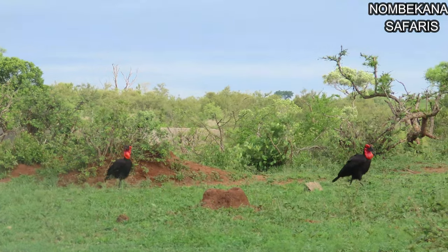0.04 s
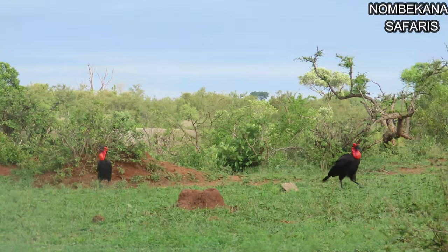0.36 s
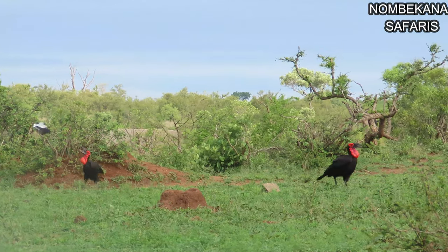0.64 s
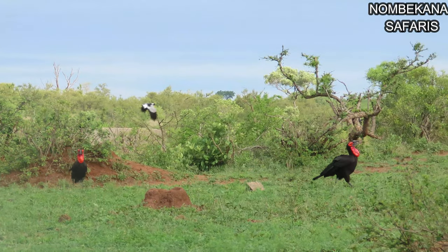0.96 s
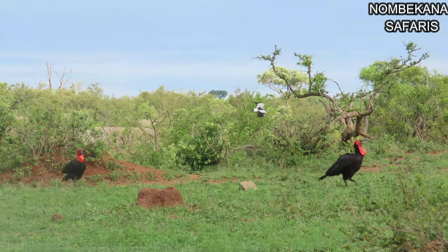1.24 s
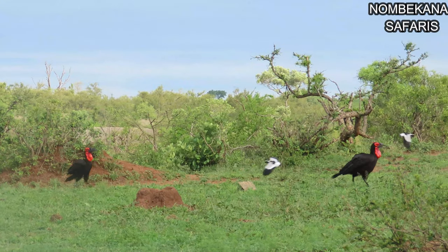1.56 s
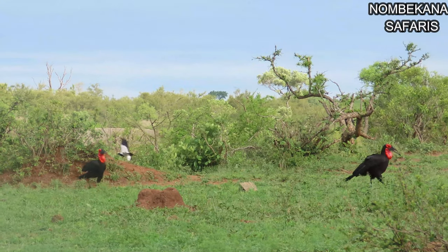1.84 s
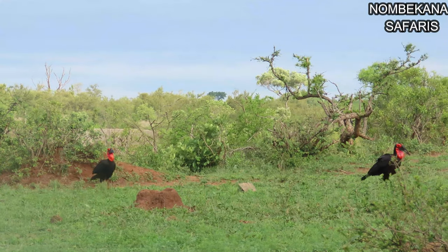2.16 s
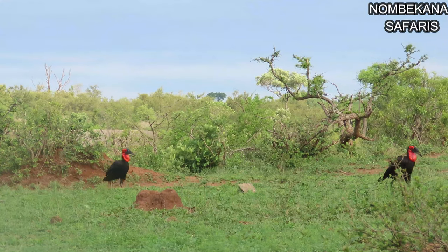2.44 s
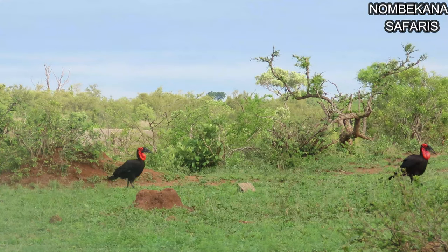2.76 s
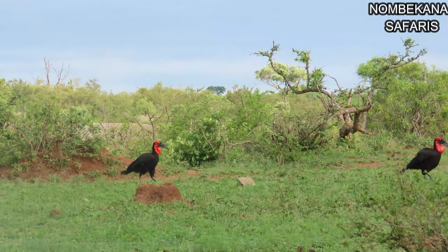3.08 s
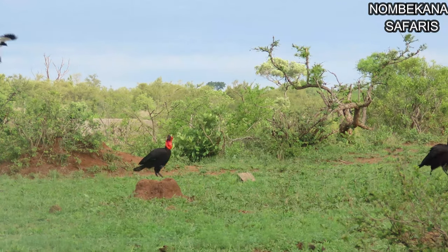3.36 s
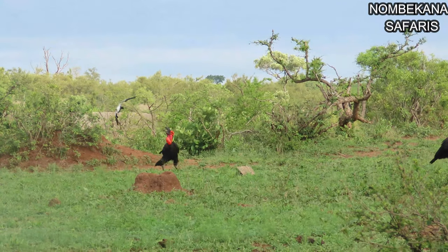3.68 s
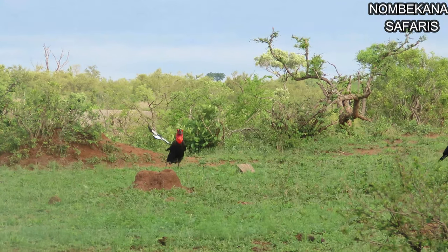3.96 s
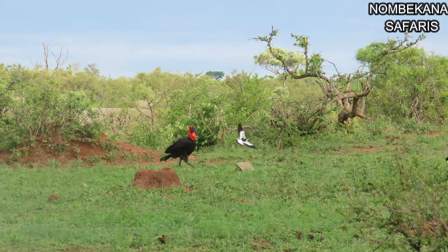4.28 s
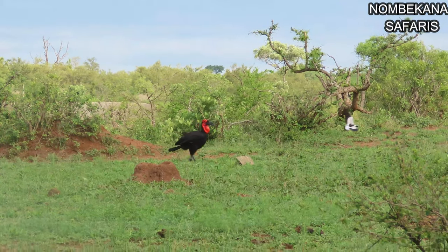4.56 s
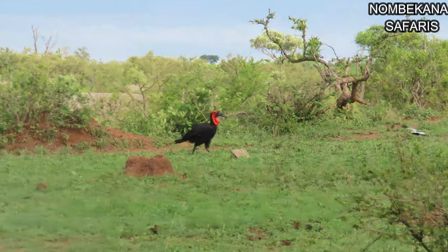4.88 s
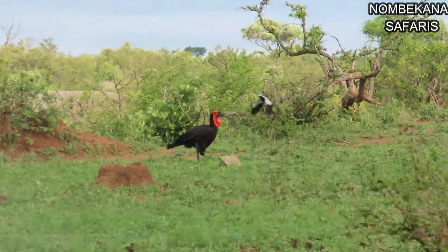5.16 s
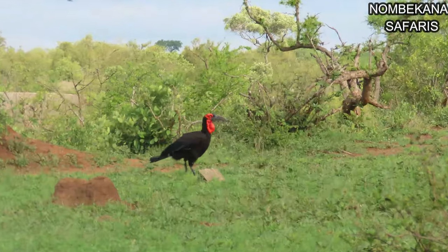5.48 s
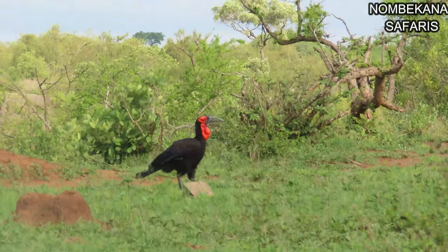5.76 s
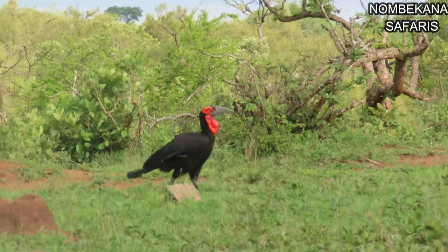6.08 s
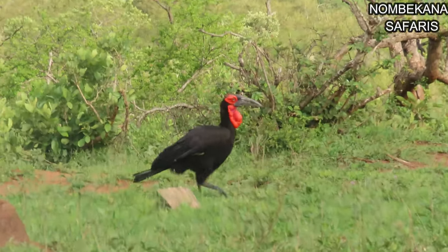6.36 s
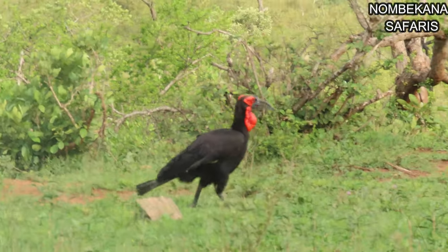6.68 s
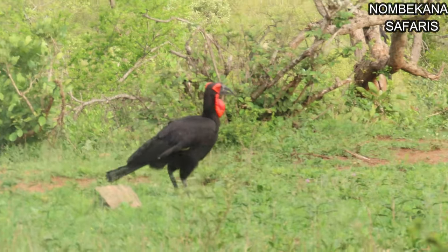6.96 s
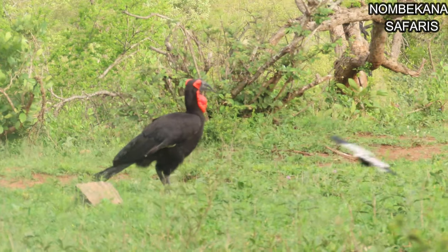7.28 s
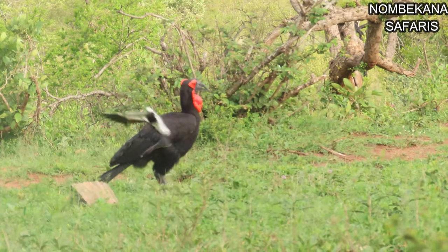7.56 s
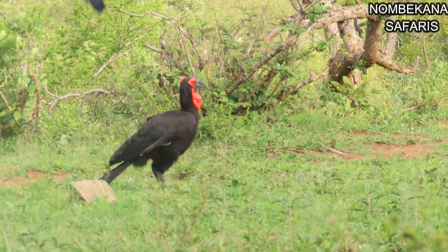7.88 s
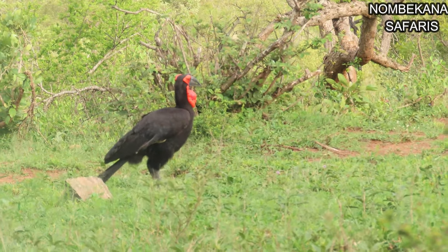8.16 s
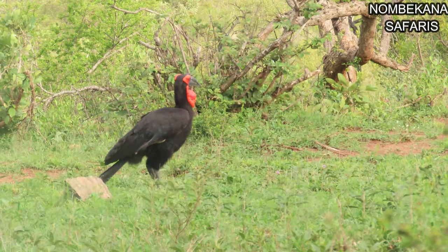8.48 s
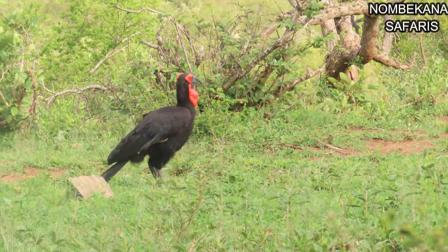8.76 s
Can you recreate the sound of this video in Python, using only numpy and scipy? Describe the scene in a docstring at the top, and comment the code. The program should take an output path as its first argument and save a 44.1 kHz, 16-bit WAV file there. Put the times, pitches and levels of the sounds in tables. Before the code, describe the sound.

Lapwings give sharp, metallic tink calls in uneven runs, with softer notes in between. A faint vehicle hum sits underneath and winds down about halfway through. Wind buffets the microphone with low thumps, mostly in the middle, and two soft knocks sound close by. Faint whistles of other birds come from far off, over the steady hiss and low rumble of open grassland.

```python
"""Grassland hiss and a vehicle's hum, pierced at once by the metallic 'tink' of lapwings mobbing intruders.
Each full call is a tiny grace note, a rasp and two syrinx tones sounding together; softer runs fall in
between, and bushes throw back a faint echo. Other birds whistle and hoot far off. Wind buffets the
microphone and a faint whirr sounds close to it. The hum winds down, and there are two soft knocks
and a pair of hollow bumps."""
import sys
import numpy as np
from scipy import signal
from scipy.io import wavfile

SR = 44100
rng = np.random.default_rng(int(sys.argv[2]) if len(sys.argv) > 2 else 0)


def transcribe(signal):
    """Save signal, clipped to [-1, 1], as a 16-bit WAV file at the path in sys.argv[1]."""
    frames = np.atleast_2d(signal).T
    limited = np.clip(frames, -1, 1)
    pcm = np.round(limited * 32767).astype(np.int16)
    wavfile.write(sys.argv[1], SR, pcm)


N = 389403
TIME = np.arange(N) / SR

# open-air bed: t/s, rumble level/dB, distant murmur level/dB
AIR_LEVELS = [(0, -45.5, -51), (4.85, -51, -53), (5.02, -52.5, -57.5), (6.66, -47.5, -59),
              (6.78, -49.5, -52.5), (8.83, -49.5, -52.5)]
# colours of the bed's three layers: f/Hz, relative density/dB
RUMBLE_SPECTRUM = [(22, -3.5), (50, -1.5), (100, -2.5), (160, -5.5), (230, -6.5), (350, -13), (700, -41)]
MURMUR_SPECTRUM = [(300, -7.5), (520, 7), (1050, 3), (2200, -3), (3500, -8), (6000, -23.5)]
HISS_SPECTRUM = [(300, 16.5), (450, 3), (620, -9), (1000, 1.5), (2000, 0), (4000, -3.5), (6000, -8),
                 (9000, -14.5), (12000, -18), (17500, -47)]
# stereo image of the bed: f/Hz, left-right correlation
STEREO_LIKENESS = [(120, 1), (260, 0.69), (500, 0.44), (1000, 0.58), (8000, 0.49), (14000, 0.31)]

# vehicle hum winding down: t/s, f/Hz, level/dB
HUM_CURVE = [(0, 188.5, -45), (3.25, 186.5, -46), (3.6, 163.4, -45.5), (3.95, 138.3, -54.5),
             (4.4, 112, -79)]
# its harmonics 1-3: relative level/dB
HUM_HARMONICS = [-2.5, -11.5, -22]

# resonances of a faint whirr close to the microphone: f/Hz, width/Hz, level/dB
WHIRR_BANDS = [(471.5, 47, -62), (876.6, 32, -60.5), (999, 44, -62)]
# fader on the whirr, which pauses for a while: t/s, gain/dB
WHIRR_FADER = [(4.75, 1.5), (4.95, -10), (6.68, -14), (6.78, -3)]
# breeze on the microphone: t/s, level/dB, eddy centre f/Hz
BREEZE = [(1.85, -53.5, 55), (2.3, -39, 52), (2.68, -33, 57.6), (3.1, -47.5, 83.5), (3.42, -41, 76),
          (4.03, -36, 100), (4.27, -40.5, 71.6), (4.44, -33, 87), (4.52, -44.5, 90), (4.62, -33.5, 114),
          (4.8, -37.5, 114), (4.9, -47, 120), (5.35, -47, 99), (6.05, -50, 73), (6.36, -37, 87),
          (6.9, -57.5, 70), (7.9, -47, 88), (8.2, -54, 86)]

# full calls: t/s, length/s, low voice f/Hz, high voice f/Hz, low voice level/dB, high voice level/dB,
# low voice's octave level/dB, rasp level/dB, rasp length/s, grace note lead/s
FULL_CALLS = [(0.126,0.041,4330,6500,-38,-46,-46,-33.5,0.0023,.013),
              (0.3,0.04,4268,6330,-34.5,-46,-49.5,-36,0.0019,.012),
              (.466,.036,4237,6210,-34.5,-42,-49,-36,0.00091,0.014),
              (0.994,0.024,4100,5950,-57,-64,-71,-47,0.0073,0.011),
              (1.223,0.038,4310,6300,-47,-59,-61,-45.5,0.0081,0.0057),
              (1.64,0.014,4480,6240,-47,-57,-63,-40.5,0.0055,0.01),
              (2.546,0.024,4380,6160,-31.5,-35.5,-48.5,-33.5,0.01,0.014),
              (2.742,0.025,4270,6100,-29,-37.5,-53,-29,0.01,0.014),
              (2.9395,.029,4215,5995,-36.5,-40,-45.5,-26.5,0.0021,0.012),
              (3.125,0.03,4120,5970,-47,-39,-46,-26.5,0.0018,0.013),
              (3.3202,0.018,4595,6740,-32,-46,-44,-32.5,0.0053,0.011),
              (3.522,0.024,4470,6570,-36,-51.5,-49,-33.5,0.0063,0.0084),
              (4.054,0.015,4610,6540,-36,-46,-55.5,-30,0.0049,0.0095),
              (5.853,0.019,4370,6310,-31,-45,-66,-37,0.0057,0.01),
              (6.057,0.03,4360,6290,-42,-39.5,-38.5,-33.5,0.0089,0.0065),
              (6.5607,0.024,4305,6150,-32,-42,-55,-34,0.0075,0.0082),
              (6.7483,0.027,4110,5760,-31,-45,-39.5,-33.5,0.00084,0.01),
              (7.146,0.015,4110,5900,-38,-49.5,-58,-34.5,0.0037,0.012),
              (8.208,0.034,4250,6070,-41.5,-51,-64,-36,0.011,0.013),
              (8.3964,0.031,4135,5920,-33,-37.5,-49,-32,0.0058,0.016),
              (8.589,0.023,4260,6140,-47,-56,-52.5,-46,0.01,0.0098),
              (8.766,0.036,4200,6175,-44.5,-50,-68,-38.5,0.0065,.012)]
# grace note harmonics 1-6: relative level/dB
GRACE_HARMONICS = [-6.5, 7, 2, -3, -14, -17.5]
# envelope of a call's tones: share of the length, gain/dB
CALL_ENVELOPE = [(0, 1), (.25, 2.2), (.5, 1.7), (.78, -.5), (1, -7.5)]
# throat resonances: f/Hz, width/Hz, relative level/dB
THROAT_BANDS = [(3100, 200, 2), (3360, 110, -19), (3950, 410, 4), (5630, 560, -8), (7900, 7300, -6.5)]
# thin whistles of far birds: t/s, length/s, start f/Hz, end f/Hz, arch as a share of pitch, level/dB
FAR_WHISTLES = [(.565, .082, 5250, 5550, -.065, -61), (0.703, 0.014, 5240, 5470, 0.0082, -49),
                (1.801, 0.037, 1335, 1290, 0.0027, -54.5), (1.935, 0.032, 1900, 1780, -0.002, -52.5),
                (3.954, 0.073, 4100, 3450, 0, -59.5), (4.302, .023, 3430, 3260, 0, -56),
                (7.07, 0.16, 5540, 4100, -0.019, -58), (7.351, 0.16, 5600, 4230, 0.0057, -61.5),
                (7.699, 0.13, 5230, 3820, -0.01, -62.5)]
# low, distant hoots: t/s, f/Hz, level/dB
FAR_HOOTS = [(5.378, 437, -55.5), (5.524, 438, -52.5)]
# soft calls between the attacks: t/s, low voice f/Hz, low voice level/dB, high voice level/dB
SOFT_RUNS = [(.893,4000,-57.5,-61.5), (1.806,4250,-60,-67), (1.9,4120,-57,-70), (1.984,4310,-57.5,-64.5),
             (2.148,4280,-52.5,-59), (2.343,4300,-48.5,-54.5), (2.886,4484,-57,-59), (4.984,3990,-68,-63),
             (5.16,4100,-53,-78), (5.262,4360,-56.5,-71), (5.351,4320,-56,-71), (5.44,4350,-50.5,-69),
             (5.654,4440,-46.5,-52), (6.143,4450,-50.5,-56.5), (7.279,4380,-53,-69), (7.474,4280,-58.5,-62),
             (7.682,4220,-56,-60.5), (7.838,4220,-55.5,-59), (8.031,4170,-46.5,-57.5)]

# sudden buffets of wind: t/s, level/dB, eddy f/Hz
WIND_BUFFETS = [(2.357,-31,72.4), (2.619,-32,66.8), (2.751,-28,75.8), (2.968,-31,97.8), (3.864,-27,94.2),
                (4.353,-24.5,104.8), (4.46,-24.5,110.4), (4.578,-30.5,169.8), (4.642,-36.5,189),
                (4.722,-22.5,98.8), (4.752,-22,107.2), (4.82,-32.5,195.7), (5.413,-33.5,133.6),
                (5.755,-32,141.9)]
# soft, hollow bumps: t/s, level/dB, f/Hz
HOLLOW_BUMPS = [(4.862, -43.5, 440), (4.902, -38.5, 432)]
# knocks: t/s, body level/dB, tick level/dB
KNOCK_HITS = [(3.013, -32, -34), (6.5907, -22, -24.5)]
# modes of the knocked body: f/Hz, relative level/dB, t60/s
BODY_MODES = [(670, -16, 0.016), (848, -9.5, 0.057), (965, 1, 0.05), (1980, -2, 0.016)]


def from_db(db):
    """Decibels to gain."""
    return 10 ** (np.asarray(db) / 20)


def rms_one(x):
    """Scale to unit rms."""
    return x / np.sqrt(np.mean(x ** 2) + 1e-20)


def in_time(rows):
    """Each column of an automation curve at every sample."""
    times, *columns = np.transpose(rows)
    return [np.interp(TIME, times, column) for column in columns]


def at_hz(points, hz):
    """Read a spectrum on a log-frequency axis."""
    freqs, values = np.transpose(points)
    return np.interp(np.log(hz), np.log(freqs), values)


def add(track, s, sound):
    """Mix a sound into a track at s seconds."""
    start = max(round(s * SR), 0)
    track[start:start + len(sound)] += sound[:max(N - start, 0)]


def band(x, low_hz, high_hz):
    """Butterworth band-pass."""
    sos = signal.butter(2, [low_hz, min(high_hz, SR * .49)], "band", fs=SR, output="sos")
    return signal.sosfilt(sos, x)


def noise(shape, low_hz, high_hz):
    """A band of noise at unit rms."""
    return rms_one(band(rng.standard_normal(shape), low_hz, high_hz))


def drift(rate, size=N):
    """Random modulation with a spread near 1, changing `rate` times a second."""
    steps = np.arange(size) * rate / SR
    count = int(steps[-1]) + 2
    return np.interp(steps, np.arange(count), rng.standard_normal(count))


def phase_of(hz):
    """Running phase of an oscillator, from a random start."""
    return 2 * np.pi * (np.cumsum(hz) / SR + rng.random())


def noise_bed(spectrum, flicker_db, flicker_rate):
    """Half-octave bands of stereo noise, flickering partly together; unit rms."""
    bed, together = 0, drift(flicker_rate)
    edges = 20 * 2 ** np.arange(0, 10.1, .5)
    white = rng.standard_normal((2, 2, N))
    for k, (low, high) in enumerate(zip(edges, edges[1:])):
        hz = np.sqrt(low * high)
        if spectrum[0][0] <= hz <= spectrum[-1][0]:
            mid, side = band(white[k % 2], low, high)
            alike = at_hz(STEREO_LIKENESS, hz)
            gain = from_db(at_hz(spectrum, hz) + flicker_db * (together + drift(flicker_rate)) / 2)
            bed += gain * (np.sqrt(1 + alike) * mid + np.sqrt(1 - alike) * side * [[1], [-1]])
    return rms_one(bed)


def open_air(hiss_db=-56):
    """A low rumble, a distant murmur that drops away for a while, and the hiss of the bush."""
    rumble_db, murmur_db = in_time(AIR_LEVELS)
    rumble = from_db(rumble_db) * noise_bed(RUMBLE_SPECTRUM, flicker_db=2.5, flicker_rate=17)
    murmur = from_db(murmur_db) * noise_bed(MURMUR_SPECTRUM, flicker_db=3, flicker_rate=20)
    hiss = from_db(hiss_db) * noise_bed(HISS_SPECTRUM, flicker_db=-2.76, flicker_rate=2.37)
    return rumble + murmur + hiss


def vehicle():
    """A fan-like hum that runs down."""
    hz, level_db = in_time(HUM_CURVE)
    phase = phase_of(hz * (1 + .0068 * drift(12)))
    return np.sqrt(2) * sum(from_db(level_db + db + drift(12)) * np.sin(k * phase)
                            for k, db in enumerate(HUM_HARMONICS, 1))


def whirr():
    """A faint whirr close to the microphone, in three narrow resonances, that pauses for a while."""
    bands = sum(from_db(db) * noise(N, hz - width / 2, hz + width / 2) for hz, width, db in WHIRR_BANDS)
    return bands * from_db(in_time(WHIRR_FADER)[0])


def wind(spread_octaves=.72, side_db=-15, side_db_per_octave=3, lumpy_db=3, lump_rate=34):
    """Lumpy turbulence around a moving pitch; small eddies differ more between the microphone ports."""
    level_db, centre_hz = in_time(BREEZE)
    eddies, power = 0, 0
    edges = 25 * 2 ** np.arange(0, 4.6, .5)
    for low, high in zip(edges, edges[1:]):
        hz = np.sqrt(low * high)
        weight = np.exp(-.5 * (np.log2(hz / centre_hz) / spread_octaves) ** 2)
        mid, side = noise((2, N), low, high)
        width = from_db(side_db + side_db_per_octave * np.log2(hz / 100))
        eddies += weight * (mid + width * side * [[1], [-1]])
        power += weight ** 2
    swell = from_db(level_db + lumpy_db * drift(lump_rate))
    return band(swell * eddies / np.sqrt(power), 26.5, 490)   # the ports pass only big, slow eddies


def grace_note(low_hz, lead_s, length_s=.009):
    """A tiny upward chirp near a third of the low voice's pitch, higher the closer it is to the call."""
    u = np.linspace(0, 1, int(length_s * SR))
    hz = low_hz * np.interp(lead_s, [.011, .016], [.345, .315])
    phase = phase_of(hz * (1 + .16 * (u - .5)) * (1 + .03 * drift(2000, len(u))))
    swell = 1.35 * np.abs(np.sin(np.pi * u)) ** .75
    return swell * sum(from_db(db) * np.sin(k * phase) for k, db in enumerate(GRACE_HARMONICS, 1))


def clang(a, b, low, high, octave_db, fifth):
    """Sum and difference tones of phases a and b ring like metal; a fifth favours the difference."""
    sum_tone = from_db(-10 - 10 * fifth) * np.sin(a + b)
    difference_tone = from_db(-12 + 12.3 * fifth) * np.sin(b - a)
    partials = ((-13, 2 * a - b), (-8, 2 * b - a), (-15, 2 * b), (-27, 3 * b - a), (-27, 2 * a + b))
    sheen = high * sum(from_db(db) * np.sin(phase) for db, phase in partials)
    third_harmonic = from_db(octave_db - 23) * np.sin(3 * a)
    return np.sqrt(low * high) * (sum_tone + difference_tone) + sheen + third_harmonic


def rasp(t, low_hz, low_phase, locked, force, burst_s=.0022, buzz_t60=.088):
    """A burst in the throat climbs on a coarse tone, then lingers as a buzz once the voices lock."""
    size = len(t)
    climb_hz = low_hz * (.44 - .08 * np.exp(-t / .007))
    phase = phase_of(climb_hz * (1 + .035 * drift(2000, size)))
    coarse = np.sin(2 * phase) + from_db(-14.5) * (np.sin(3 * phase) + np.sin(phase))
    throat = 0
    for hz, width, db in THROAT_BANDS:
        settled = noise(2 * size, hz - width / 2, hz + width / 2)[size:]
        throat += from_db(db) * rms_one(settled)
    burst = force * np.exp(-(t / burst_s) ** 2)
    attack = (.85 - .3 * burst) * coarse + (.17 + .27 * force + .45 * burst) * rms_one(throat)
    # the buzz sits on sevenths of the low voice's pitch
    buzz = sum(np.sin(k * low_phase / 7 + 2 * np.pi * rng.random() + .7 * drift(600, size))
               for k in (3, 4, 5, 6, 8))
    return (1 - locked) * attack + locked * (1 + force) / 2 * from_db(-13 - 60 * t / buzz_t60) * buzz


def tink(length, low_hz, high_hz, low_db, high_db, octave_db, rasp_db, rasp_s, force):
    """The syrinx's two sides rasp, then lock to tones that modulate each other; force (0-1) adds bite."""
    bloom_s, release_s, breath_t60 = .0066, .0035, .11
    scoop_s, droop_s, sag_per_s = .0073, .038, .63
    t = np.arange(int((length + release_s) * SR)) / SR
    size = len(t)
    # both voices scoop up to pitch and droop when held
    bend = 1.01 - .064 * np.exp(-t / scoop_s) - .041 * (t / droop_s) ** 3
    # the high voice sags in hard calls, unless it is held a fifth above the low one
    fifth = np.exp(-((high_hz / low_hz - 3 / 2) / .029) ** 2)
    sag = 1 - sag_per_s * force * (1 - fifth) * (t - length / 2)
    jitter = .005 + .014 * np.exp(-t / .012)
    low_phase, high_phase = (phase_of(hz * bend * (1 + jitter * drift(1000, size)))
                             for hz in (low_hz, high_hz * sag))
    low, high = (from_db(db + 2 * drift(160, size)) * (1 + .12 * force * drift(1000, size))
                 for db in (low_db, high_db))
    # in slurred calls the low voice leads and hands over to the high one
    handover_db = 9 * (1 - force) * (t / length - .5)
    onset = np.exp(-t / bloom_s)
    low *= from_db(-handover_db / 2)
    high *= from_db(handover_db) * (1 - .53 * onset)
    tones = low * np.sin(low_phase) + high * np.sin(high_phase)
    tones += from_db(octave_db) * np.sin(2 * low_phase)
    tones += (1 - onset) * clang(low_phase, high_phase, low, high, octave_db, fifth)
    # turbulent hiss dies away as the tones steady
    breath = from_db(-8 - 60 * t / breath_t60) * noise(size, 1800, 7400)
    tones += np.sqrt(low * high) * (.5 + force) * breath
    locked = .5 + .5 * np.tanh((t - rasp_s) / .001)   # crossfade from rasp to tones
    grit = from_db(rasp_db) * rasp(t, low_hz, low_phase, locked, force)
    envelope = from_db(np.interp(t / length, *np.transpose(CALL_ENVELOPE)))
    fade_in = np.clip(t / (.002 - .001 * force), 0, 1)
    fade_out = np.clip((length + release_s - t) / release_s, 0, 1)
    return np.sqrt(2) * fade_in * fade_out * (locked * envelope * tones + grit)


def lapwings(slurred_lead_s=.0069, hard_lead_s=.015):
    """Full calls: a close grace note slurs into the tink; after a longer gap the tink bursts out."""
    out = np.zeros(N)
    for s, length, low_hz, high_hz, low_db, high_db, octave_db, rasp_db, rasp_s, lead_s in FULL_CALLS:
        grace_db = (max(low_db, high_db) + rasp_db) / 2 - 14.5
        grace = from_db(grace_db) * grace_note(low_hz, lead_s)
        force = np.interp(lead_s, [slurred_lead_s, hard_lead_s], [0, 1])
        add(out, s - lead_s - len(grace) / SR / 2, grace)
        add(out, s, tink(length, low_hz, high_hz, low_db, high_db, octave_db, rasp_db, rasp_s, force))
    return out


def microphone_ports(x, port_hz=10800, width_hz=2100):
    """Sound from straight ahead meets a resonance at the left port that turns the phase of its treble."""
    radius = np.exp(-np.pi * width_hz / SR)
    poles = [1, -2 * radius * np.cos(2 * np.pi * port_hz / SR), radius ** 2]
    return np.array([signal.lfilter(poles[::-1], poles, x), x])


def bushes(send, near_db=-17, far_db=-29.5):
    """Scatter from nearby scrub and a later, faint tail from the tree line, different on each side."""
    t = TIME[:SR]
    near, far = (rng.standard_normal((2, SR)) * from_db(-60 * t / t60) * (t > predelay_s)
                 for t60, predelay_s in ((.095, .004), (.45, .04)))
    echo = from_db(near_db) * rms_one(near) + from_db(far_db) * rms_one(band(far, 800, 5500))
    return signal.fftconvolve(send[None], echo / np.sqrt(SR), axes=1)[:, :N]


def far_note(hz, db):
    """A thin tone that swells and fades, wavering in the moving air."""
    u = np.linspace(0, 1, len(hz))
    swell = from_db(db + 3 * drift(130, len(u))) * np.sqrt(2 * np.abs(np.sin(np.pi * u)))
    return swell * np.sin(phase_of(hz * (1 + .014 * drift(600, len(u)))))


def far_birds(hoot_s=.098, hoot_arch=.06):
    """Whistles glide, or dip and curl up; hoots arch a little in pitch."""
    out = np.zeros(N)
    for s, length, start_hz, end_hz, arch, db in FAR_WHISTLES:
        u = np.linspace(-1, 1, int(length * SR))
        glide_hz = np.geomspace(start_hz, end_hz, len(u)) * (1 + arch * (1 - u ** 2))
        add(out, s, far_note(glide_hz, db))
    hoot_bend = 1 - hoot_arch * np.linspace(-1, 1, int(hoot_s * SR)) ** 2
    for s, hz, db in FAR_HOOTS:
        add(out, s, far_note(hz * hoot_bend, db))
    return out


def soft_calls(length_s=.026, voice_ratio=1.42):
    """Tinks without a grace note, and their echo send: brighter ones scatter more in the scrub."""
    direct, send = np.zeros((2, N))
    for s, hz, low_db, high_db in SOFT_RUNS:
        call = tink(length_s, hz, hz * voice_ratio, low_db, high_db,
                    octave_db=high_db - 5, rasp_db=high_db - 16, rasp_s=.0023, force=.38)
        send_db = 9 + min(high_db - low_db, 0) / 2
        add(direct, s, call)
        add(send, s, from_db(send_db) * call)
    return direct, send


def thuds(rows, half_width_s, steepen=0):
    """A few uneven swings of pressure swell and die; `steepen` skews the wave at the crest."""
    out, t = np.zeros(N), TIME[:SR // 5] - .1
    swell = 1 / np.cosh(t / half_width_s)
    for s, db, hz in rows:
        phase = phase_of(hz * 2 ** (.3 * drift(1.5 * hz, len(t))))
        wave = np.sin(phase + steepen * swell * np.sin(phase))
        add(out, s + t[0], np.sqrt(2) * from_db(db) * swell * wave)
    return out


def knocks(contact_s=.00348, tick_t60=.012, clack_t60=.032):
    """A soft contact rings a hollow body, with a dull clack and a bright tick on top."""
    out, t = np.zeros(N), TIME[:SR // 10]
    body = sum((-1) ** k * from_db(db - 60 * t / t60) * np.sin(2 * np.pi * hz * t)
               for k, (hz, db, t60) in enumerate(BODY_MODES))
    attack = np.minimum(t / contact_s, 1)
    for s, body_db, tick_db in KNOCK_HITS:
        clack = from_db(tick_db - 4 - 60 * t / clack_t60) * noise(len(t), 570, 1900)
        tick = from_db(tick_db - 60 * t / tick_t60) * noise(len(t), 4070, 4860)
        add(out, s - contact_s / 2, attack * (from_db(body_db) * body + clack))
        add(out, s + contact_s / 2, tick)
    return out


def scene():
    """Birds ahead, scrub all round, wind and vehicle close by, over the open-air bed."""
    near, far = lapwings(), far_birds()
    soft, soft_send = soft_calls()
    echo_send = near + soft_send + from_db(2) * far
    mix = microphone_ports(near + soft + far) + bushes(echo_send)
    mix += knocks() + vehicle() + whirr() + wind()
    mix += thuds(WIND_BUFFETS, half_width_s=.0061, steepen=.47)
    mix += thuds(HOLLOW_BUMPS, half_width_s=.0033)
    return mix + open_air()


def record(dry, cutoff_hz=15800):
    """A steep low-pass takes off the very top."""
    return signal.sosfilt(signal.ellip(10, .1, 90, cutoff_hz, fs=SR, output="sos"), dry)


dry = scene()
out = record(dry)
transcribe(out)
```